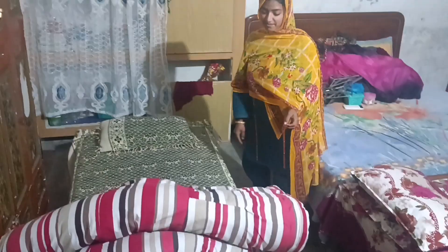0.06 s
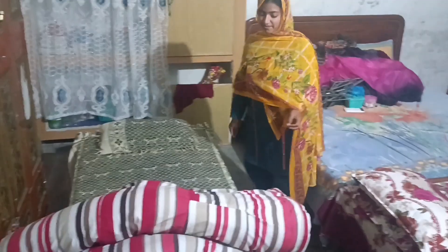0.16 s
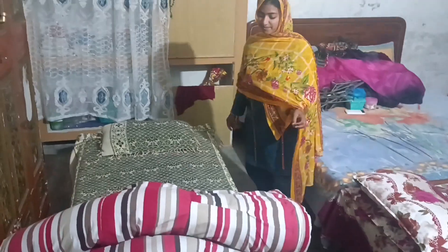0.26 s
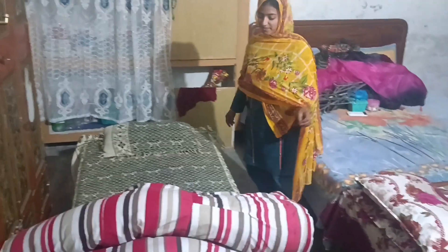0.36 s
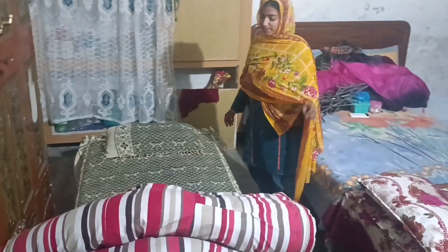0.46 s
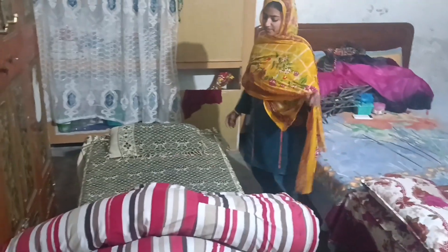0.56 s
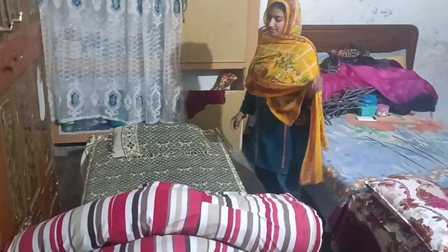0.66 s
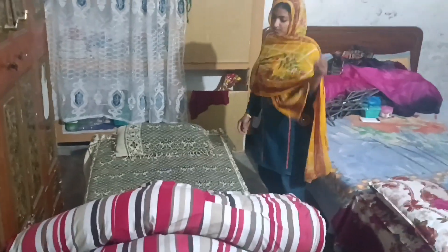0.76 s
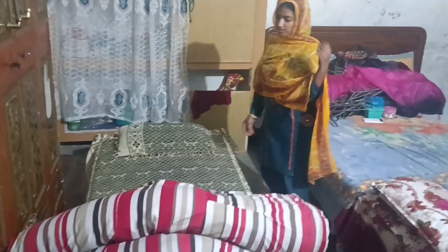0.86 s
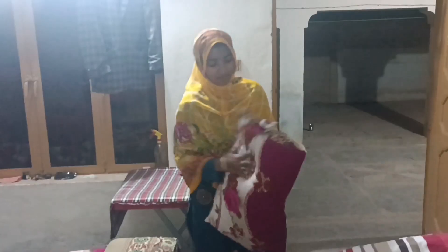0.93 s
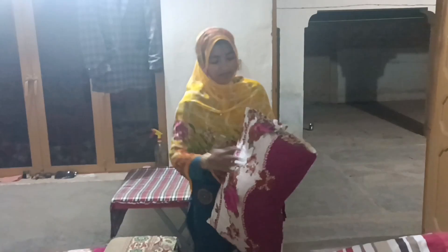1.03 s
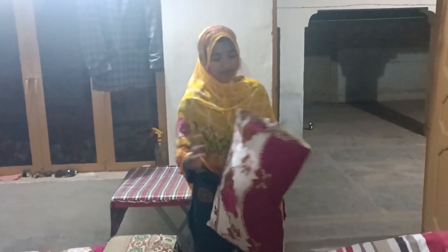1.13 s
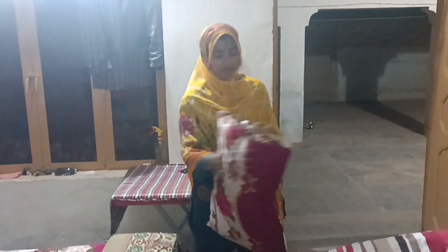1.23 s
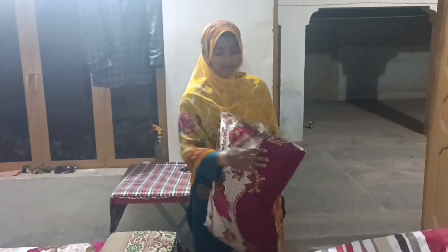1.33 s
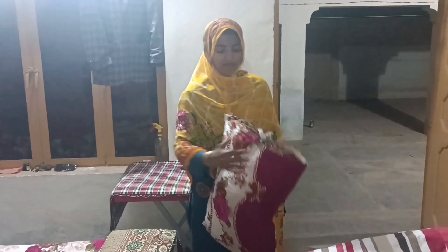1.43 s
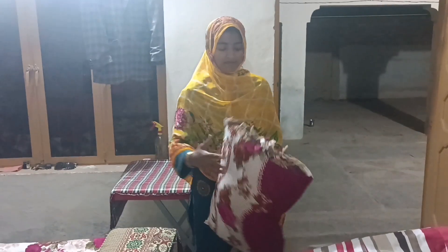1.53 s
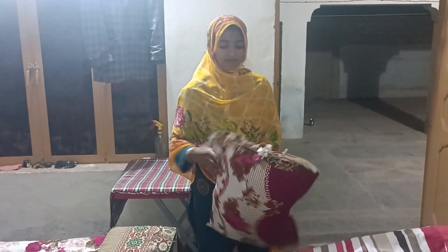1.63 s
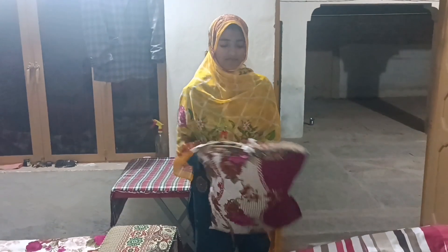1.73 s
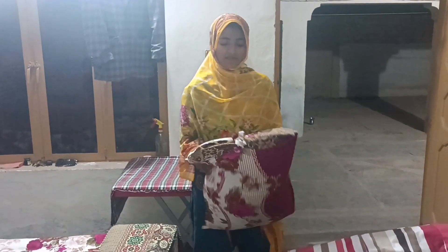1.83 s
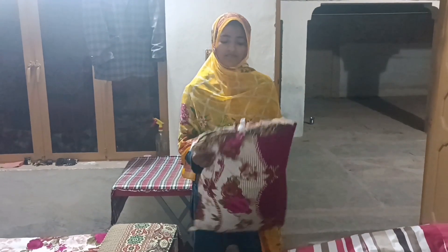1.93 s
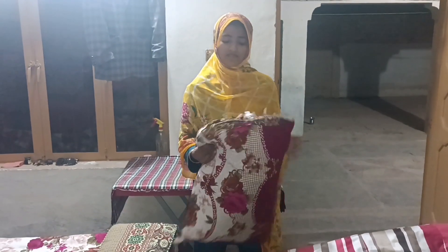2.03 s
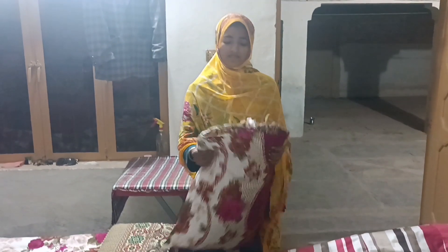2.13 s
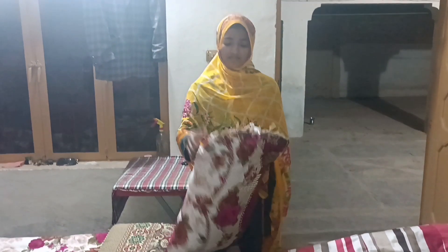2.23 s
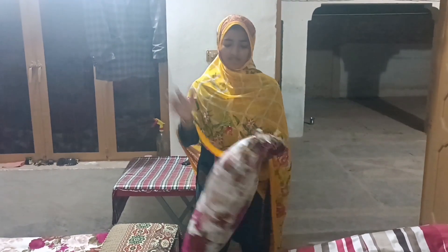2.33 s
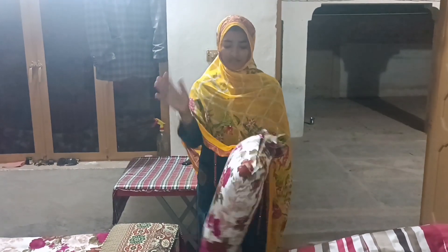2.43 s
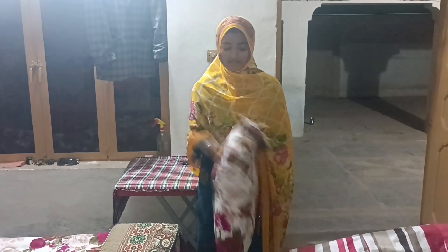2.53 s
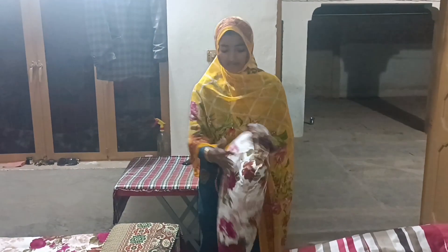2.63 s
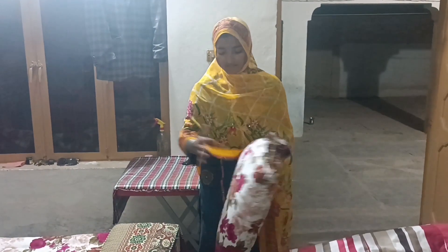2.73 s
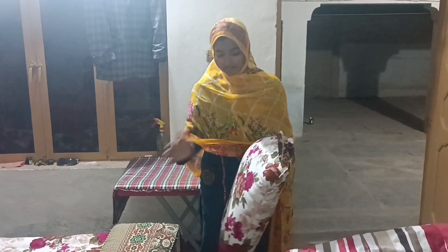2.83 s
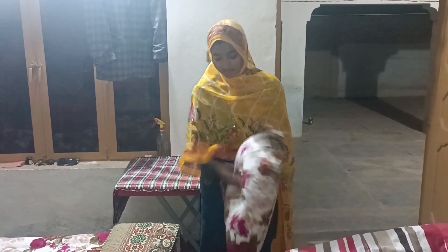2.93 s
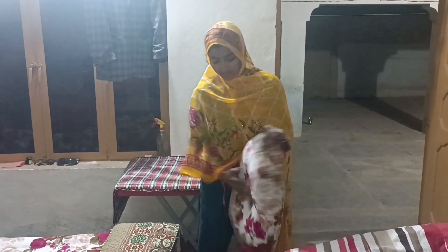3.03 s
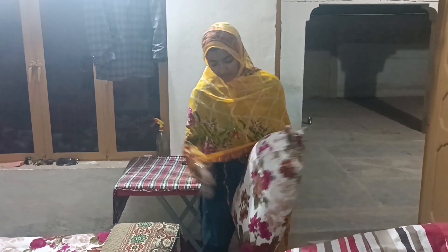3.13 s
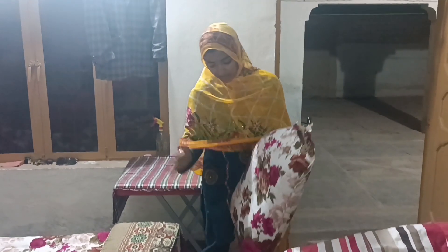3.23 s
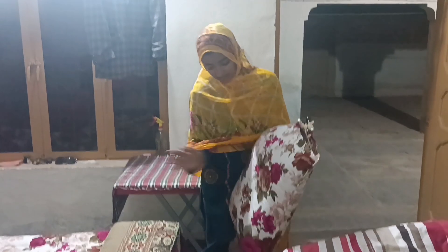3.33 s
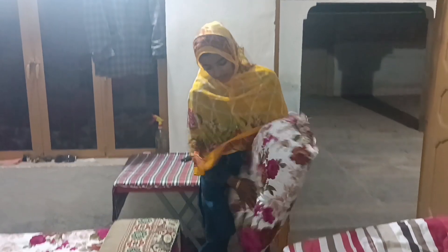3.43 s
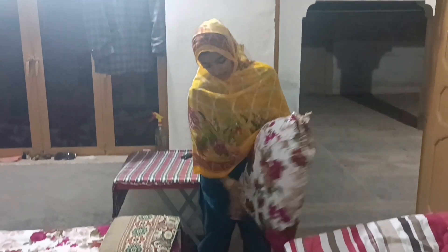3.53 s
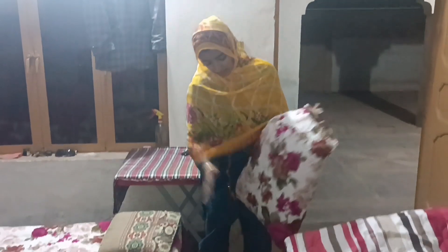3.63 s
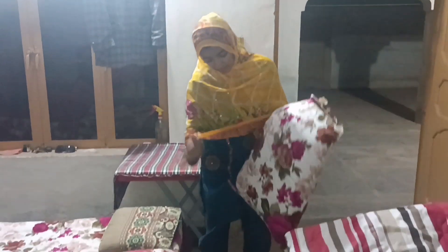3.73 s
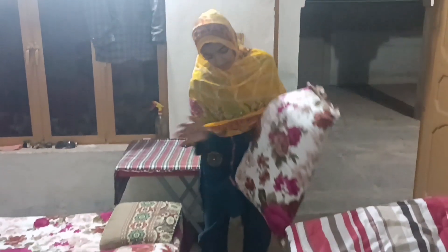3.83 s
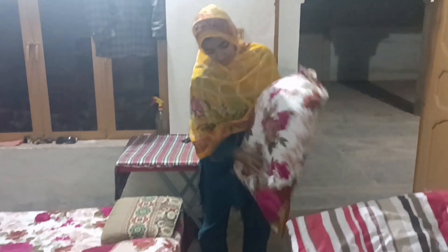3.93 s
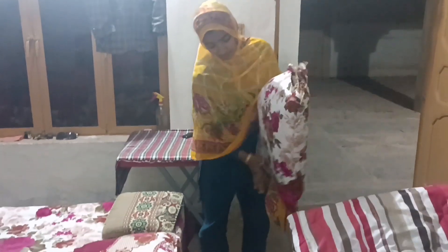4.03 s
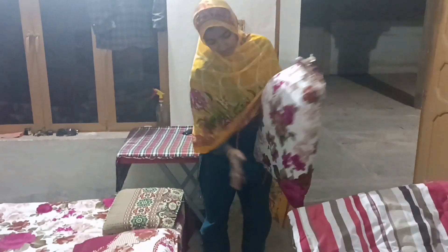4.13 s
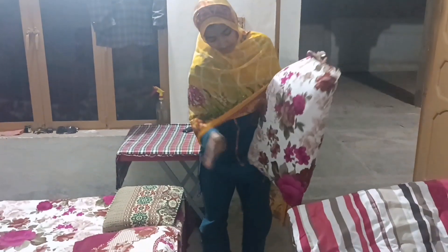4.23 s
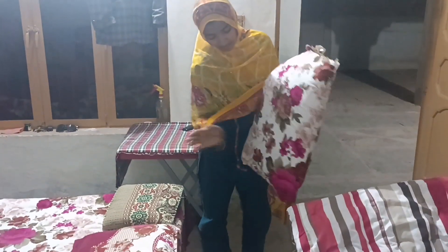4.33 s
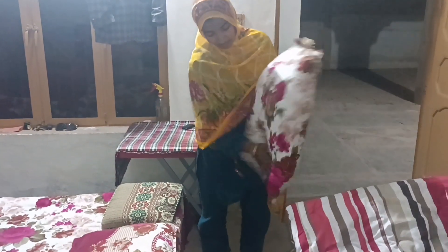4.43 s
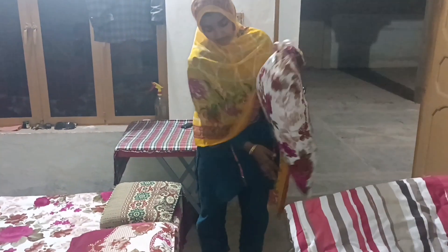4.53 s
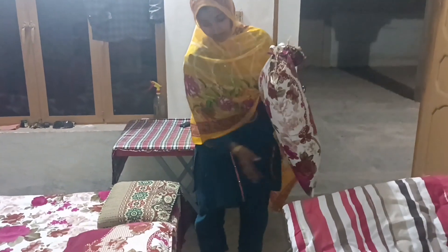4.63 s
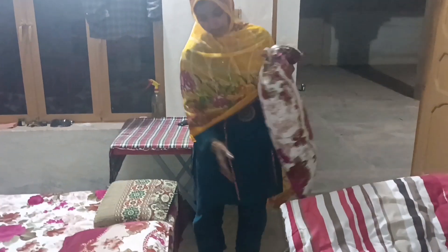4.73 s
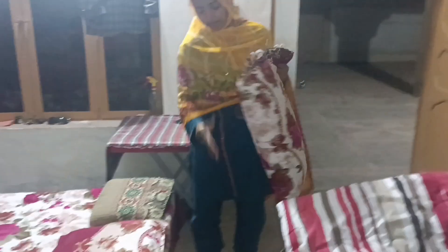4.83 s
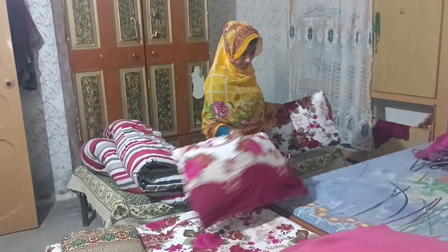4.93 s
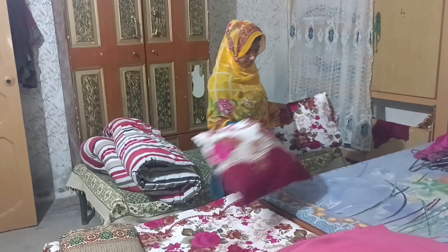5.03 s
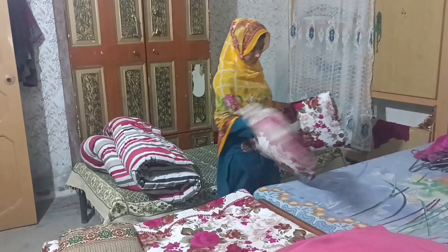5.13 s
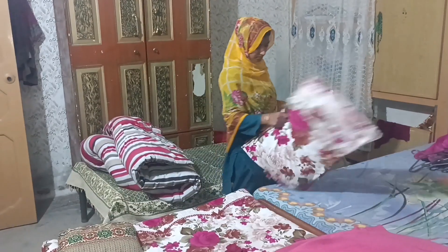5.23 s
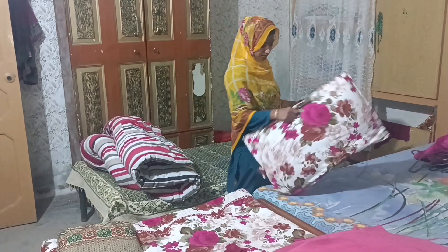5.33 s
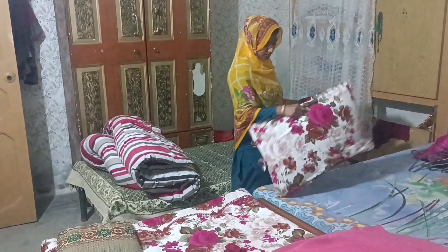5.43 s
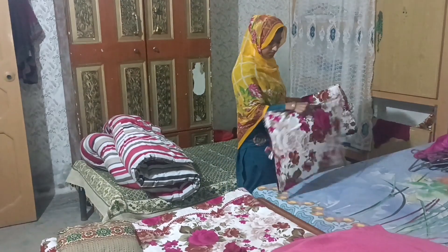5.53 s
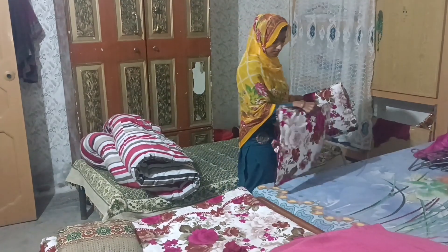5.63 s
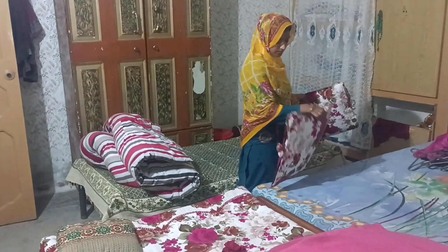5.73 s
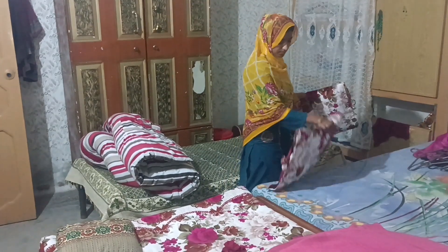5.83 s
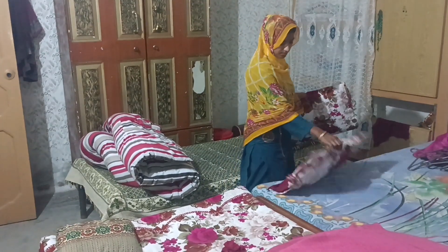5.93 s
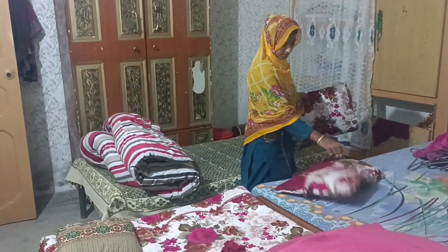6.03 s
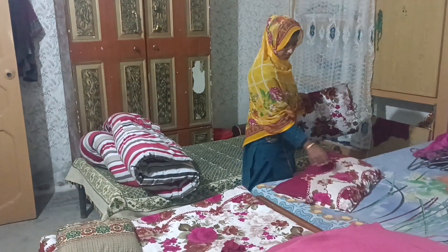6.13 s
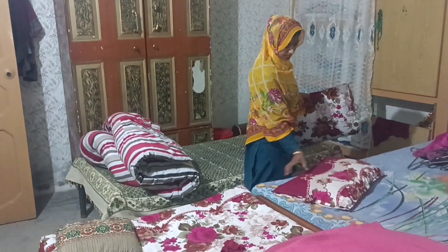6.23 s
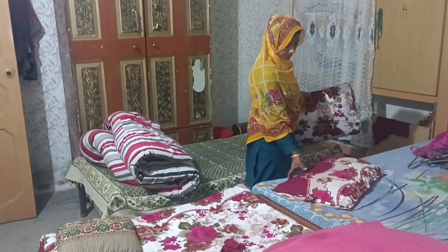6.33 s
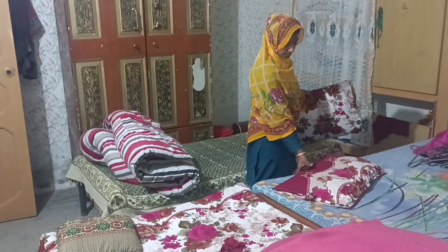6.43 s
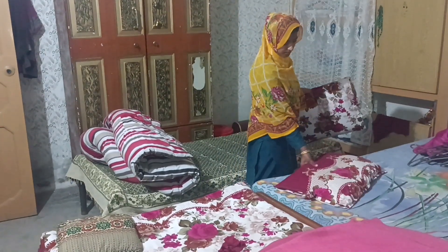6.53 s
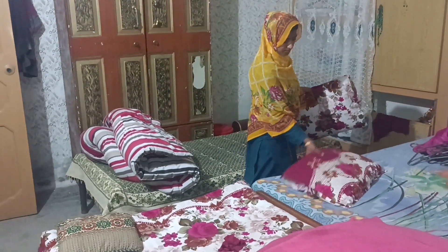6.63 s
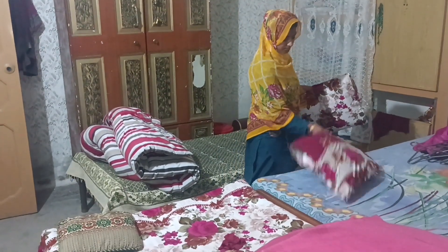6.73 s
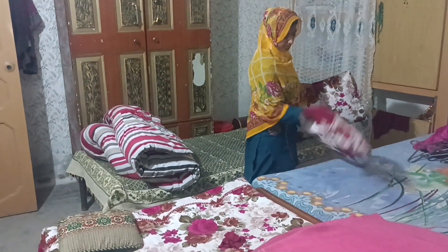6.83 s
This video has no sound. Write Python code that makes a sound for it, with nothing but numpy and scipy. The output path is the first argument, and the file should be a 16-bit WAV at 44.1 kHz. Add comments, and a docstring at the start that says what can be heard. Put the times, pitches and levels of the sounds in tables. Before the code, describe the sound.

A palm smacks a stuffed pillow seven times, each thump ringing off hard walls, bangles tinkling faintly, before the pillow flops onto a bed.

```python
"""In a bare-walled room, a hand slaps a pillow seven times; it is then caught and dropped on the bed.
Each slap is a thump of trapped air (a short wave) and a crack of skin on cloth (a noise burst).
Echoes, standing waves and fading noise make the room boom and ring after it.
Glass bangles jingle on the wrist as groups of fading tones, and grainy noise makes the cloth rustle.
Taps and a faint hum are shaped noise. Early on, the whole sound drops out briefly and fades back in."""
import sys
import numpy as np
from scipy import signal
from scipy.fft import rfft, irfft, next_fast_len
from scipy.io import wavfile
from scipy.ndimage import uniform_filter1d

SR = 44100
rng = np.random.default_rng(int(sys.argv[2]) if len(sys.argv) > 2 else 0)


def wav_record(signal):
    """Record a signal, one row per channel, as 16-bit PCM in the file named by sys.argv[1]."""
    frames = np.transpose(np.atleast_2d(signal))
    bounded = np.clip(frames, -1, 1)
    # unit amplitude maps onto the largest positive 16-bit level
    quanta = np.round(bounded * 32767).astype(np.int16)
    wavfile.write(sys.argv[1], SR, quanta)


N = 303306   # samples in the whole sound

# every event is made in one buffer, with its own moment (age 0) a little after the start
LEAD = SR // 6   # samples before that moment
AGE = (np.arange(2 ** 15) - LEAD) / SR   # seconds
HZ = np.maximum(np.fft.rfftfreq(2 ** 15, 1 / SR), 1)


def from_db(db):
    """Turn decibels into a gain."""
    return 10 ** (np.asarray(db) / 20)


def rms_one(x):
    """Scale a sound to an rms (average strength) of 1."""
    return x / np.sqrt(np.mean(x ** 2) + 1e-20)


def at_hz(points, hz):
    """Read a two-column table between its points, on a log-frequency axis."""
    table = np.array(points)
    return np.interp(np.log(hz), np.log(table[:, 0]), table[:, 1])


def add(out, s, sound):
    """Mix in an event so that its age 0 falls at time s."""
    start = round(s * SR) - LEAD
    first, last = max(start, 0), min(start + len(AGE), N)
    out[:, first:last] += sound[..., first - start:last - start]


def dying(t60):
    """Silence, then a steady decay that falls 60 dB in t60 seconds."""
    return (AGE >= 0) * from_db(-60 * np.maximum(AGE, 0) / t60)


def excite(drive, response):
    """Let one sound set off another (convolution); both have age 0 at LEAD."""
    both = signal.fftconvolve(np.atleast_2d(drive), np.atleast_2d(response), axes=-1)
    return both[:, LEAD:LEAD + len(AGE)]


def formant(x, hz, db, q):
    """Lift or dip one band with a ringing filter; a higher q is narrower."""
    w, lift = 2 * np.pi * hz / SR, from_db(db / 2)
    alpha = np.sin(w) / (2 * q)
    top = [1 + alpha * lift, -2 * np.cos(w), 1 - alpha * lift]
    bottom = [1 + alpha / lift, -2 * np.cos(w), 1 - alpha / lift]
    return signal.lfilter(top, bottom, x + 1e-18)


# how alike left and right are: f/Hz, correlation (1 = the same, 0 = unrelated)
LEFT_RIGHT_LIKENESS = [(60, 0.98), (200, 0.8), (450, 0.8), (900, 0.072), (2000, 0.053), (15000, 0.1)]


def noise(colour_db, length=len(AGE)):
    """Coloured stereo noise of rms 1, alike in the bass and nearly unrelated in the treble."""
    hz = np.maximum(np.fft.rfftfreq(length, 1 / SR), 1)
    alike = np.clip(at_hz(LEFT_RIGHT_LIKENESS, hz), -1, 1)
    random_phases = np.exp(2j * np.pi * rng.random((2, len(hz))))
    mid, side = random_phases * from_db(np.interp(hz, HZ, colour_db))
    spectrum = np.sqrt(1 + alike) * mid + np.sqrt(1 - alike) * np.array([side, -side])
    return rms_one(irfft(spectrum, length))


def tilted(colour, tilt_db):
    """A spectrum in dB, leaned by tilt_db per octave from 300 Hz up to 6000 Hz."""
    return at_hz(colour, HZ) + tilt_db * np.log2(np.clip(HZ, 300, 6000) / 300)


# the slaps: t/s, thump level/dB, crack level/dB, boom level/dB, lift of the deepest standing wave level/dB,
# treble tilt/(dB per octave), tail decay factor, boom decay factor, palm cup f/Hz, hollow f/Hz,
# taut cloth f/Hz, delay until the bangles fall back t/s, level of that fall/dB, its rattle length t/s
SLAPS = [(1.046, -1, 1.5, 6.5, -1, 0.3, 1, 0.72, 493, 95, 3600, 0.018, -34.5, 0.062),
         (1.4296, -4, -4, 10.5, -3, 2, 0.89, 0.53, 1223, 500, 3150, 0.17, -52, 0.095),
         (2.7179, -1.5, -8, 10, 2.5, -0.1, 0.96, 0.78, 500, 355, 760, 0.069, -44.5, .008),
         (3.110, -5.5, -6, 10, 6, 0.3, 0.84, 0.67, 520, 228, 1950, .031, -38.5, .01),
         (3.588, -4, -5, 3.5, 7.5, 0.5, 0.68, 0.69, 483, 850, 1330, 0.081, -50.5, 0.01),
         (4.112, -3.5, -4.5, 6, 2, 3, 0.86, 0.89, 291, 465, 2250, 0.068, -37.5, .045),
         (4.591, -2, -3, 6, 0.5, -0.13, 0.86, 0.88, 345, 1060, 2550, 0.05, -38.5, 0.096)]
# a slap's noise as the walls return it, before the tilt: f/Hz, level/dB per Hz
SLAP_COLOUR = [(45, -28.5), (85, -7.5), (180, -4), (280, -0.5), (420, -9), (700, -10.5), (1300, -15.5),
               (2500, -18), (4000, -22.5), (6200, -25), (8500, -43), (12000, -48), (15500, -54)]
# narrow bands that the room favours in every slap: f/Hz, lift level/dB
ROOM_RINGS = [(349, 3), (455, 4), (546, 3.5), (592, 2.5), (696, 3.5), (854, 0), (979, 1.5), (1125, 2.5),
              (1255, 2), (2155, 2.5), (3255, 3)]
THUMP_HZ, TAIL_DB = 214.6, -13.5   # pitch of the trapped air, level of the room's tail


def slaps():
    """The palm squeezes the pillow, the cloth cracks, and the room answers."""
    out = np.zeros((2, N))
    for (s, thump_db, crack_db, boom_db, deep_db, tilt_db, tail_stretch, boom_stretch,
         cup_hz, hollow_hz, cloth_hz, *_) in SLAPS:
        colour = tilted(SLAP_COLOUR, tilt_db)
        thump = from_db(thump_db) * air_pulse(THUMP_HZ, centre_s=.0024, width_s=.0019)
        # fingers brush the cloth just before the palm lands; the crack has little bass
        touch = from_db(-15) * (AGE < 0) * np.exp(-np.abs(AGE) / 0.0014)
        burst = noise(colour - 30 * (HZ < 400)) * (touch + dying(t60=0.013))
        # part of the left burst goes to both sides, which draws the crack to the middle
        crack = from_db(crack_db) * (0.39 * burst[0] + 0.4 * burst)
        tail = from_db(TAIL_DB) * room_tail(colour, tail_stretch, build_s=.003)
        room_boom = boom(thump, boom_db, boom_stretch, spread_db=2.0, build_s=0.042)
        slap = thump + crack + tail + room_boom
        deepest_hz = ROOM_MODES[0][0]
        slap = formant(slap, deepest_hz, deep_db, q=4.9)
        add(out, s, hand_on_pillow(slap, cup_hz, hollow_hz, cloth_hz))
    for hz, db in ROOM_RINGS:
        out = formant(out, hz, db, q=40)
    return out


def air_pulse(hz, centre_s, width_s):
    """Air is squeezed out and sucked back: a wave that swells and dies; a wide one swings repeatedly."""
    t = AGE - centre_s
    return -np.sin(2 * np.pi * hz * t) * np.exp(-.5 * (t / width_s) ** 2)


def hand_on_pillow(slap, cup_hz, hollow_hz, cloth_hz):
    """The cupped palm rings low, the folds swallow a band, and the taut cover rings higher."""
    cup_q, hollow_q = 3.1, 4.9
    slap = formant(slap, cup_hz, db=7, q=cup_q)
    slap = formant(slap, cup_hz * 2.15, db=3, q=cup_q)   # the cup repeats higher up
    slap = formant(slap, hollow_hz, db=-8.5, q=hollow_q)
    slap = formant(slap, hollow_hz * 1.95, db=-3, q=hollow_q)   # so does the hollow
    return formant(slap, cloth_hz, db=5, q=3.2)


# first echoes from floor and walls: delay t/s, level/dB
ECHOES = [(.0055, -16), (0.0109, -6), (0.0321, -6.5), (.041, -11)]
# standing waves of the room: f/Hz, level/dB before the random spread, 60 dB decay t/s before the slap's factor
ROOM_MODES = [(89, -17, 0.35), (112.7, -18.5, 0.44), (158.2, -13, 0.36), (195.7, -16.5, 0.36),
              (232.5, -23.5, 0.22), (275, -16, .36), (293.6, -22, 0.33), (338, -22.5, 0.52), (460, -24, .3)]


def boom(thump, boom_db, stretch, spread_db, build_s):
    """A thump returns from the walls and wakes the standing waves, a little differently each time."""
    echoes = sum(from_db(db) * np.interp(AGE - delay, AGE, thump) for delay, db in ECHOES)
    modes = np.zeros(len(AGE))
    for k, (hz, db, t60) in enumerate(ROOM_MODES):
        gain = (-1) ** k * from_db(db + rng.normal(0, spread_db))   # every second one is flipped
        modes += gain * np.cos(2 * np.pi * hz * AGE) * room_decay(stretch * t60)
    build = 1 - np.exp(-np.maximum(AGE, 0) / build_s)
    return echoes + from_db(boom_db) * excite(thump, modes * build) / (SR * 0.0038)


def room_decay(t60, bend=1.19):
    """A decay that starts slowly and then falls ever faster."""
    return (AGE >= 0) * from_db(-60 * (np.maximum(AGE, 0) / t60) ** bend)


# how long the room rings in each band: f/Hz, 60 dB decay t/s before the slap's factor
ROOM_T60 = [(60, 0.54), (300, .33), (600, 0.32), (1200, 0.34), (2600, 0.37), (4500, .28), (7000, 0.34),
            (15000, 0.13)]


def room_tail(colour_db, stretch, build_s):
    """Diffuse echoes build up quickly and die at the pace of each band."""
    spectrum = rfft(noise(colour_db))
    centres, t60s = np.transpose(ROOM_T60)
    tail = np.zeros((2, len(AGE)))
    for only_this_band, t60 in zip(np.eye(len(centres)), t60s):
        share = np.interp(np.log(HZ), np.log(centres), only_this_band)   # neighbours cross-fade
        tail += irfft(spectrum * share) * room_decay(stretch * t60)
    return tail * (1 - np.exp(-np.maximum(AGE, 0) / build_s))


# the bangles clash as the hand moves between and after the slaps: t/s, level/dB, rattle length t/s
JINGLES = [(1.255, -41, .05), (1.72, -50.5, .05), (1.874, -36, .02), (1.9, -37, .11), (2.649, -55, 0.0055),
           (2.906, -53.5, 0.027), (3.542, -43, .035), (5.425, -37.5, .04), (5.703, -66, .02)]
# glass rings come in close groups, before detuning and spread: f/Hz, level/dB, 60 dB decay t/s before damping
BANGLE_RINGS = [(3590, -24, 0.29), (4280, -28, 0.28), (5650, -16, 0.55), (5900, -13.5, 0.17),
                (8350, -18, 0.11), (8530, -16.5, 0.098), (8800, -12.5, 0.12), (11240, -11.5, 0.064),
                (11700, -13, .12), (14420, -11, .11), (15000, -6.5, .11), (15560, -5.5, .11),
                (14700, -9, .11), (14850, -7, 0.095), (15250, -3.5, 0.24)]
BANGLE_COUNT, BANGLE_DETUNE, CLASH_SPREAD_DB = 5, .007, 2.5   # detune is a fraction of the pitch
JOLT_DB, JOLT_S = -40.5, .02   # each slap jolts the bangles at once: level, rattle length
WRIST_DAMP_S = .085   # time scale on which the wrist smothers a ringing bangle


def bangles(clashes_per_s, tick_db, room_db):
    """Each jingle is a run of glass-on-glass clashes, shared among bangles of slightly different pitch."""
    out = np.zeros((2, N))
    ring_hz, ring_db, ring_t60 = np.transpose(BANGLE_RINGS)
    age = np.arange(SR // 5) / SR
    # each ring starts softly, over a millisecond or so, without a click
    soft_start = 1 - np.exp(-age / .0012)
    damping = np.exp(-(age / WRIST_DAMP_S) ** 2)
    fades = from_db(-60 * age / ring_t60[:, None]) * soft_start * damping
    # thin glass radiates no low sound
    no_lows = signal.butter(4, 3000, "high", fs=SR, output="sos")
    # a slap throws the bangles up the arm, and they fall back a moment later
    jolts = [(s, JOLT_DB, JOLT_S) for s, *_ in SLAPS]
    falls = [(s + after_s, db, rattle_s) for s, *_, after_s, db, rattle_s in SLAPS]
    for s, db, length_s in JINGLES + jolts + falls:
        count = 2 + int(length_s * clashes_per_s)
        when, force_db = rng.random(count), rng.normal(0, 3, count)
        # the bangles take turns, each tuned and struck a little differently
        detune = BANGLE_DETUNE * rng.uniform(-1.4, 1, (BANGLE_COUNT, len(ring_hz)))
        voices = []
        for hz in ring_hz * (1 + detune):
            gains = from_db(ring_db + rng.normal(0, CLASH_SPREAD_DB, (2, len(ring_hz))))
            voices.append(gains @ (fades * np.sin(2 * np.pi * np.outer(hz, age))))
        clashes = np.zeros((2, len(AGE)))
        starts = LEAD + (length_s * SR * (when - when.min())).astype(int)
        for k, start in enumerate(starts):
            clashes[:, start:start + len(age)] += from_db(force_db[k]) * voices[k % BANGLE_COUNT]
            clashes[:, start] += from_db(force_db[k] + tick_db)   # one-sample tick of contact
        clashes = signal.sosfilt(no_lows, clashes + 1e-18)
        walls = rng.standard_normal((2, len(AGE))) * dying(t60=0.23)
        jingle = clashes + from_db(room_db) * excite(clashes, walls / np.linalg.norm(walls[0]))
        # the level is set by the loudest short stretch
        loudest = np.sqrt(uniform_filter1d(np.mean(jingle ** 2, axis=0), size=1000).max())
        add(out, s, from_db(db) * jingle / loudest)
    return out


# the pillow is caught or lands: t/s, level/dB, swell t/s, 60 dB decay t/s, treble tilt/(dB per octave),
# resonance f/Hz, its boost level/dB
PLOPS = [(5.182, -42.5, 0.0097, 0.17, 6, 785, 17.5), (6.229, -26.5, 0.022, 0.28, -3, 266.5, 6.5)]
# noise of the soft thud, before the tilt: f/Hz, level/dB per Hz
PLOP_COLOUR = [(45, -16), (90, 5), (160, -0.5), (350, -8), (550, -20), (800, -21.5), (1500, -30),
               (4000, -41), (12000, -74)]


def plops():
    """The soft pillow meets hands or mattress gradually, so its thud swells before it dies."""
    out = np.zeros((2, N))
    for s, db, swell_s, t60, tilt_db, ring_hz, ring_db in PLOPS:
        swell = from_db(-1.0) * (AGE < 0) * np.exp(-np.abs(AGE) / swell_s)
        thud = from_db(db) * noise(tilted(PLOP_COLOUR, tilt_db)) * (swell + dying(t60))
        add(out, s, formant(thud, ring_hz, ring_db, q=2.14))
    return out


# dull low pulses, fingers landing early, then soft thuds of the pillow: t/s, level/dB, f/Hz, width t/s
BUMPS = [(1.4235, -12.5, 302.5, 0.00076), (4.909, -39, 84.8, 0.008), (5.201, -48.5, 87, 0.023),
         (6.231, -20, 235, 0.0028)]


def bumps():
    """Fingers landing early, then soft thuds of the pillow, each a dull low pulse."""
    out = np.zeros((2, N))
    for s, db, hz, width_s in BUMPS:
        add(out, s, from_db(db) * air_pulse(hz, 0, width_s))
    return out


# cloth rustles, the sleeve swishes before some slaps, or the pillow is handled:
# t/s, level/dB, width t/s, treble tilt/(dB per octave)
RUSTLES = [(0.005, -50.5, 0.021, -1), (0.889, -69, 0.065, 0.5), (2.309, -60.5, 0.092, -0.5),
           (2.639, -60, 0.097, -7), (3.579, -48.5, .015, 3), (3.983, -62, 0.045, -1),
           (4.549, -53.5, .021, 6.5), (6.111, -62, 0.051, 1), (6.268, -45, 0.026, 0),
           (6.571, -59, 0.025, -1)]
# noise of the cloth, before the tilt: f/Hz, level/dB per Hz
RUSTLE_COLOUR = [(40, -27.5), (150, 1.5), (600, 0.5), (1400, -3.5), (2600, -5), (4500, -14), (6500, -11),
                 (9000, -31), (15000, -40)]


def rustles():
    """Threads catch and slip in uneven grains under each movement of the cloth."""
    out = np.zeros((2, N))
    for s, db, width_s, tilt_db in RUSTLES:
        motion = np.exp(-.5 * (AGE / width_s) ** 2)
        wander = rms_one(uniform_filter1d(rng.standard_normal(len(AGE)), size=150))
        grain = rms_one(from_db(2.5 * wander))
        add(out, s, from_db(db) * motion * grain * noise(tilted(RUSTLE_COLOUR, tilt_db)))
    return out


# light hard taps: t/s, level/dB, treble tilt/(dB per octave)
TAPS = [(0.422, -55.5, 24), (3.974, -63.5, 15), (6.281, -37, -1), (6.302, -37, -1)]
# noise of a tap, before the tilt: f/Hz, level/dB per Hz
TAP_COLOUR = [(400, -23), (850, -11), (1150, 9), (1700, -9.5), (3000, 2), (4500, -17), (7000, -30),
              (9500, -30), (15000, -42)]


def taps():
    """A short knock of noise with a faint room tail."""
    out = np.zeros((2, N))
    envelope = dying(t60=0.056) + from_db(-17) * dying(t60=0.16)
    for s, db, tilt_db in TAPS:
        add(out, s, from_db(db) * noise(tilted(TAP_COLOUR, tilt_db)) * envelope)
    return out


# colour of the room hum: f/Hz, relative level/dB per Hz
HUM_COLOUR = [(20, -29.5), (45, -13.5), (90, -5), (160, -5), (280, -10), (520, -16.5), (1000, -21.5),
              (1600, -21.5), (2300, -20), (3200, -25), (6000, -28), (8500, -41), (13700, -48),
              (15100, -32.5), (16000, -50)]
HUM_EARLY_DB, HUM_DB = -68.5, -63.5   # level before and after the sound drops out


def room_hum(early):
    """A faint steady noise, strongest in the bass and a little louder after the drop."""
    steady = noise(at_hz(HUM_COLOUR, HZ), next_fast_len(N))[:, :N]
    return steady * from_db(np.where(early, HUM_EARLY_DB, HUM_DB))


BREAK_S, RETURN_S, FADE_IN_S = .936, 1.0077, 0.15   # the drop, start of the return, fade length


def scene():
    """Pillow, bangles and cloth over the hum; all of it drops by 46 dB once and fades back."""
    t = np.arange(N) / SR
    early = t < BREAK_S
    pillow = slaps() + plops() + bumps() + rustles() + taps()
    jingles = bangles(clashes_per_s=200, tick_db=-10.5, room_db=3.0)
    fade_in = np.clip((t - RETURN_S) / FADE_IN_S, from_db(-46), 1)
    return (pillow + jingles + room_hum(early)) * np.where(early, 1, fade_in)


def record(dry):
    """The right side is brighter, the loudest peaks are rounded off, and the top is cut at 16.3 kHz."""
    left = formant(dry[0], hz=4430, db=-6.5, q=0.92)
    right = formant(dry[1], hz=4170, db=-0.5, q=3.5)
    both = np.array([left, right])
    clipped = both / (1 + both ** 8) ** (1 / 8)
    top_cut = signal.ellip(10, .1, 80, 16300, fs=SR, output="sos")
    return signal.sosfilt(top_cut, clipped)


dry = scene()
out = record(dry)
wav_record(out)
```